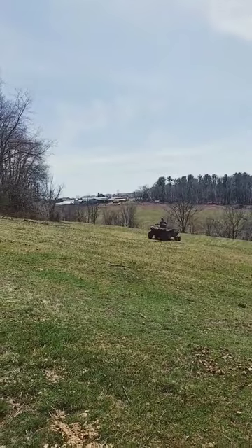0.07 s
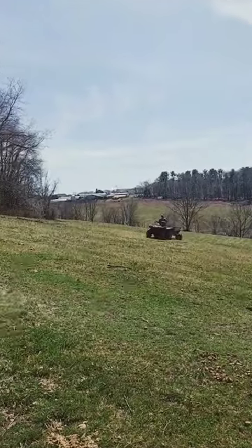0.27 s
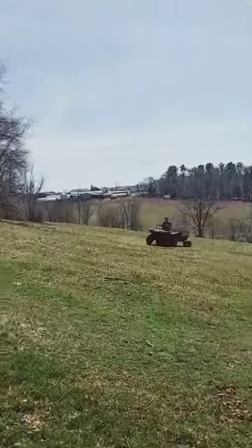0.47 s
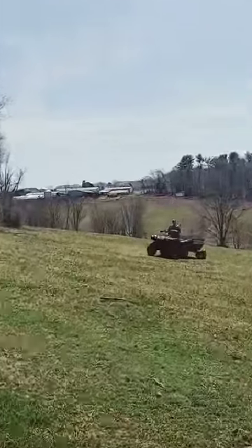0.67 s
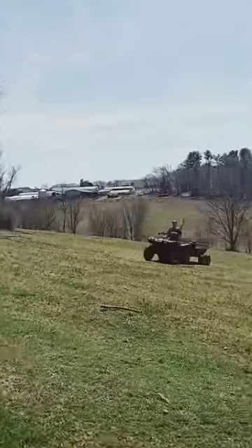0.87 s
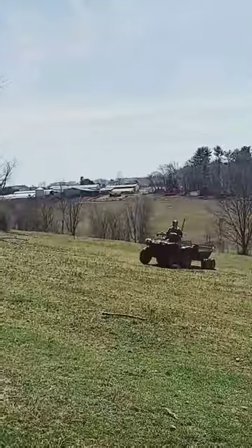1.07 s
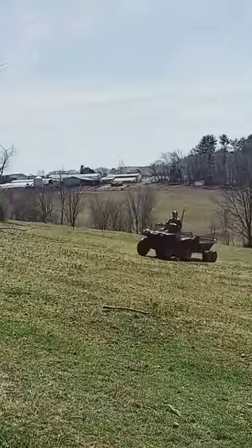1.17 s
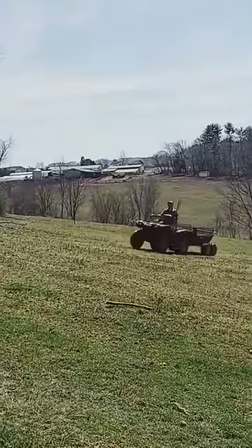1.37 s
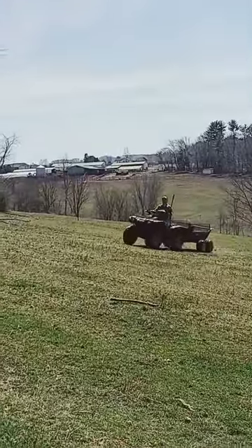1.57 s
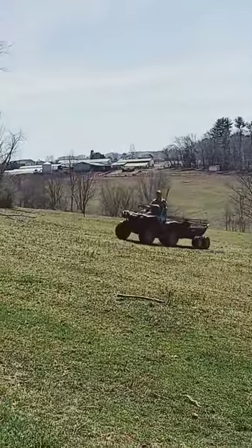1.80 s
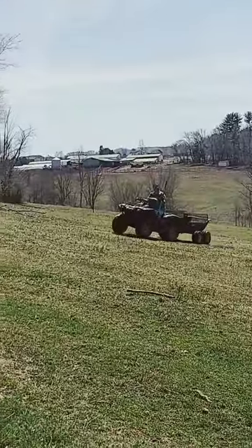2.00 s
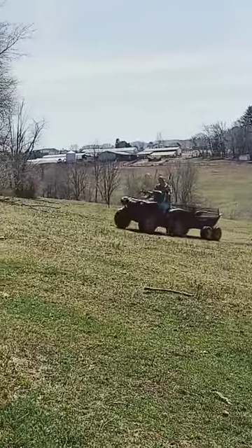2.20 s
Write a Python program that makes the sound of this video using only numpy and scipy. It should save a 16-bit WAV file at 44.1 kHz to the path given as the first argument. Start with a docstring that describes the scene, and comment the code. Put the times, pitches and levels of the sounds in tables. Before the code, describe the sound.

Steady low chug of a small single-cylinder off-road vehicle in an open field, with valve rattle and faint gear whine; soft wind buffets lean left, then a few hollow thumps, grass ticks and a twig snap.

```python
"""All-terrain vehicle over a pasture

A single-cylinder all-terrain vehicle crawls closer, towing a wagon; its layers follow one engine speed.
Each firing is a thump of tones locked to the firing rate, with a rough puff of coloured noise and clicks.
Valves clatter (impacts ringing a casing), gears whine (wavering tones), dry grass hisses and crackles.
A few dull thumps and a snapping twig ring resonances; wind rumbles (noise) mostly on the left port."""
import sys
import numpy as np
from scipy import signal
from scipy.fft import rfft, irfft
from scipy.io import wavfile

SR = 44100
rng = np.random.default_rng(int(sys.argv[2]) if len(sys.argv) > 2 else 0)


def dump_mix(stems):
    """Bounce the given channels to the path in sys.argv[1] as a 16-bit WAV at rate SR."""
    frames = np.atleast_2d(stems).T  # one column per channel
    limited = np.clip(frames, -1, 1)  # hard clip at full scale
    pcm = np.round(limited * 32767).astype(np.int16)
    wavfile.write(sys.argv[1], SR, pcm)


N = 98916
T = np.arange(N) / SR


def from_db(db):
    """Decibels to gain."""
    return 10 ** (np.asarray(db) / 20)


def rms_one(x):
    """Scale to rms 1."""
    return x / np.sqrt(np.mean(x ** 2) + 1e-20)


def in_time(rows):
    """Columns of a curve, interpolated at every sample."""
    s, *columns = np.transpose(rows)
    return [np.interp(T, s, c) for c in columns]


def swells(rows):
    """Sum of Gaussian rises and falls of gain; half is the time from the peak to 1/e."""
    return sum(from_db(db) * np.exp(-((T - s) / half) ** 2) for s, half, db in rows)


def pan(db):
    """Left and right gains for a level difference, left over right."""
    return from_db(np.array([[db], [-db]]) / 2)


def colour(x, spectrum):
    """Shape a signal by a gain curve over log frequency, falling off outside it; rms 1."""
    hz, db = np.transpose(spectrum)
    f = np.maximum(np.arange(N // 2 + 1) * SR / N, 1)
    gain = from_db(np.interp(np.log(f), np.log(hz), db))
    outside = np.minimum(f / hz[0], 1) * np.minimum(hz[-1] / f, 1)
    return rms_one(irfft(rfft(x) * gain * outside ** 2, N))


def drift(rate_hz):
    """Slow random motion, rms 1: low-passed noise drawn at every 32nd sample."""
    f = np.arange(2049) * SR / 32 / 4096
    slow = irfft(rfft(rng.standard_normal(4096)) / (1 + (f / rate_hz) ** 2))
    return rms_one(np.interp(np.arange(N) / 32, np.arange(len(slow)), slow))


def stereo(mid, side, alike):
    """Two unrelated signals mixed to a left and right of given correlation; rms 1."""
    alike = np.clip(alike, 0, .99)
    return rms_one(np.sqrt(1 + alike) * mid + np.sqrt(1 - alike) * side * np.array([[1], [-1]]))


def noise(alike):
    """White stereo noise."""
    return stereo(*rng.standard_normal((2, N)), alike)


def clicks(per_s, spread_db):
    """Random clicks of uneven size and sign; rms 1."""
    sizes = from_db(spread_db * np.minimum(rng.exponential(1, N), 3))
    return rms_one((rng.random(N) < per_s / SR) * sizes * rng.choice([-1, 1], N))


def resonate(x, modes):
    """Parallel two-pole resonances, each with its gain at the peak."""
    out = 0
    for hz, width_hz, db in modes:
        r = np.exp(-np.pi * width_hz / SR)
        poles = [1, -2 * r * np.cos(2 * np.pi * hz / SR), r * r]
        ringing = signal.lfilter([1, 0, -1], poles, x + 1e-18)
        out = out + from_db(db) * (1 - r * r) / 2 * ringing
    return out


def cut(x, hz, kind, order=2):
    """Butterworth filter."""
    return signal.sosfilt(signal.butter(order, hz, kind, fs=SR, output="sos"), x)


def at_ports(x, right_bass_cut_hz=406):
    """Left and right of a low sound: the right port loses the bass, with no delay."""
    once = cut(x, right_bass_cut_hz, "high")
    return np.array([x, cut(once[::-1], right_bass_cut_hz, "high")[::-1]])


def wind(wind_db=9, right_wind_db=-28, buffet_pan_db=9):
    """Wind noise: gusting rumble mostly on the left port, and short buffets on both."""
    # Each row: time in seconds, level in dB before wind_db.
    gusts = [(0.11, -44.5), (0.26, -44), (0.29, -40), (0.38, -42), (0.63, -46), (0.67, -40), (0.87, -39),
             (0.9, -52), (1.52, -39), (1.54, -43), (1.6, -30.5), (1.65, -43), (1.78, -39), (2.01, -39.5),
             (2.04, -46.5), (2.24, -35.5)]
    # Rumble spectrum. Each row: frequency in Hz, relative density in dB per Hz.
    wind_spectrum = [(24, -29), (32, -5.5), (42, -3), (68, -2), (100, -3.5), (160, -13), (250, -24.5),
                     (500, -33.5), (1000, -43)]
    # Each row: centre in seconds, half length in seconds, level in dB before panning.
    buffets = [(0.196, 0.072, -33.5), (.765, 0.013, -35), (1.46, 0.027, -39), (1.51, 0.0089, -31),
               (1.59, .024, -28.5)]
    # Buffet spectrum. Each row: frequency in Hz, relative density in dB per Hz.
    buffet_spectrum = [(30, -51), (70, 18), (130, -10), (220, 4.5), (370, -24.5), (520, -46), (900, -49)]
    gust_db, = in_time(gusts)
    rumble = colour(noise(alike=0.017), wind_spectrum) * from_db(gust_db + wind_db)
    rumble = rumble * from_db([[0], [right_wind_db]])
    left, right = swells(buffets) * colour(noise(alike=0.071), buffet_spectrum) * pan(buffet_pan_db)
    return rumble + np.array([left, cut(right, 61, "high")])


def grass(crackles_per_s=330, rustle_clicks_per_s=1100):
    """Dry grass brushed by tyres: noise and clicks hiss and rustle, stalks tick, one twig rings."""
    # Tyre hiss. Each row: time in seconds, level in dB before hiss_db.
    hiss_level = [(.1, -72), (.4, -52.5), (1.2, -49.5), (1.75, -47), (2.2, -53)]
    # Hiss spectrum. Each row: frequency in Hz, relative density in dB per Hz.
    hiss_spectrum = [(4000, 12.5), (7000, 4), (9000, 0.5), (12000, 4), (15500, 2)]
    # Each row: centre in seconds, half length in seconds, level in dB.
    rustle_times = [(.17, 0.019, -46), (1.075, 0.025, -45.5), (1.75, 0.012, -61), (1.875, 0.0082, -56),
                    (2.003, 0.0064, -43.5)]
    # Rustle spectrum. Each row: frequency in Hz, relative density in dB per Hz.
    rustle_spectrum = [(2500, -12), (3800, 3), (4700, 8), (5800, 5), (6700, 2), (7600, -13), (15000, -36)]
    # Ticking stalks. Each row: centre in seconds, level in dB before the high-pass.
    tick_times = [(0.642, -46), (0.954, -61), (1.129, -48), (1.642, -47), (1.743, -38), (1.755, -58),
                  (1.83, -48), (1.878, -43), (1.967, -47), (1.998, -43)]
    # Twig resonances. Each row: frequency in Hz, width in Hz, gain in dB.
    twig_modes = [(2850, 320, 0), (3490, 270, -6), (4300, 510, 0), (5990, 310, -14), (6840, 400, -11)]
    hiss_db, tick_half_s = -3.5, 0.002
    twig_s, twig_half_s, twig_peak_db, splinters = 1.8924, .0017, -20, .3

    crackle = stereo(clicks(crackles_per_s, 3.5), clicks(crackles_per_s, 8), alike=0.39)
    level_db, = in_time(hiss_level)
    hiss = colour(noise(alike=0.072) + crackle, hiss_spectrum) * from_db(level_db + hiss_db)

    rustling = noise(alike=.99) + clicks(rustle_clicks_per_s, spread_db=7)
    rustles = swells(rustle_times) * colour(rustling, rustle_spectrum)

    tick_swells = swells([(s, tick_half_s, db) for s, db in tick_times])
    ticks = cut(noise(alike=0.12) * tick_swells, 1500, "high")

    splintering = splinters * noise(alike=0.28) * swells([(twig_s, twig_half_s, 0)])
    snap = signal.unit_impulse(N, int(twig_s * SR)) + splintering
    twig = cut(resonate(snap, twig_modes), [2500, 6800], "band", order=3)
    twig = from_db(twig_peak_db) * twig / np.abs(twig).max()
    return (hiss + rustles + ticks + twig) * pan(-1)


def thumps(contact_half_s=0.00088):
    """Soft blows on a hollow, well damped body, perhaps the wagon jolting."""
    # Each row: time in seconds, blow level in dB.
    blow_times = [(1.455, -23), (1.507, -19), (1.566, -21), (1.587, -12.5), (1.751, -21)]
    # Body resonances. Each row: frequency in Hz, width in Hz, gain in dB.
    body_modes = [(83, 29, 5), (143, 42, -2), (203, 28, -18), (353, 59, -4.5)]
    blows = swells([(s, contact_half_s, db) for s, db in blow_times])
    body = resonate(blows, body_modes)
    return at_ports(body * blows.max() / np.abs(body).max())


def gears(cycles, wander_rad=0.35, flutter_db=2.5):
    """Wavering tones locked to the engine speed swell and fade."""
    # Each row: multiple of the firing rate, centre in seconds, half length in seconds, peak level in dB.
    whine = [(60, .2, .14, -48), (70, .22, .13, -52.5), (59, .66, .33, -51), (80, .8, .27, -54),
             (39, 1.35, .15, -58), (70, 1.47, .12, -57), (60, 1.82, .15, -49), (75, 1.97, .11, -48.5),
             (56, 2.03, .07, -51), (59, 2.22, .12, -47), (120, 2.08, .1, -56)]
    out = 0
    for k, s, half, db in whine:
        level = swells([(s, half, db)]) * from_db(flutter_db * drift(25))
        out = out + level * np.sin(2 * np.pi * k * cycles + wander_rad * drift(19))
    return out


def clatter(cycles, level_db, impacts_per_s=1100, impact_share=0.2):
    """Valves, chain and belt: impacts and rubbing swell twice per firing cycle and ring the casing."""
    # Direct spectrum. Each row: frequency in Hz, relative density in dB per Hz.
    clatter_spectrum = [(500, 6.5), (800, -0.5), (1200, -1), (1700, 3), (2400, 2.5), (2800, -0.5),
                        (3250, -3.5), (4200, -4), (6200, -1.5), (7200, -13.5), (9000, -20.5),
                        (15000, -12.5)]
    # Engine casing resonances. Each row: frequency in Hz, width in Hz, gain in dB.
    casing_modes = [(1320, 70, 0), (1697, 60, -2), (1930, 110, 2), (2610, 90, 3.5), (4100, 70, -4),
                    (4600, 80, -4), (5550, 120, -5)]
    direct_db, casing_db, swing_db, flutter_db = 1, -10, 0.6, 1.05
    impacts = stereo(clicks(impacts_per_s, 2.5), clicks(impacts_per_s, 9), alike=0.72)
    drive = np.sqrt(impact_share) * impacts + np.sqrt(1 - impact_share) * noise(alike=0.51)
    swell_db = swing_db * np.cos(2 * np.pi * 2 * cycles)  # once per crank turn
    drive = drive * from_db(swell_db + flutter_db * drift(60))
    direct = from_db(direct_db) * colour(drive, clatter_spectrum)
    casing = from_db(casing_db) * rms_one(resonate(drive, casing_modes))
    return from_db(level_db) * (direct + casing)


def puffs(cycles, level_db, eddies_per_s=220, eddy_share=0.63):
    """Turbulent gas (noise) and its eddies (clicks) swell after each firing, never twice alike."""
    # Each row: frequency in Hz, relative density in dB per Hz.
    puff_spectrum = [(120, -33), (220, -12.5), (290, -5), (370, -1), (470, -7), (620, -18), (900, -21.5),
                     (1500, -26.5)]
    puff_db, peak_phase_cycles, swing_db, pan_db = -2, 0.081, 1, -6
    eddies = stereo(clicks(eddies_per_s, 1.5), clicks(eddies_per_s, 0), alike=0.56)
    gas = np.sqrt(eddy_share) * eddies + np.sqrt(1 - eddy_share) * noise(alike=0.43)  # power share
    swell_db = swing_db * np.cos(2 * np.pi * (cycles - peak_phase_cycles))
    return colour(gas * from_db(swell_db), puff_spectrum) * from_db(level_db + puff_db) * pan(pan_db)


def exhaust(cycles, level_db, flutter_db=1.64, wander_rad=0.064, jitter_cycles=0.0067):
    """Pipe tones line up once per firing into a thump that sweeps upward; the timing is a little uneven."""
    # Levels in dB of the multiples 2, 3, 4 .. of the firing rate, before the common swing.
    tone_levels_db = [-50.5, -37, -39.5, -52.5, -51, -54, -44.5, -51, -48, -50.5, -50, -58, -57, -66, -57]
    firing_phase_cycles, pipe_spread_s_per_hz = 0.0669, .000012  # higher tones leave the pipe later
    follow_share, scatter_db = 0.26, 1.6  # share of the puffs' level swing; random level scatter
    rate_hz = cycles[-1] / T[-1]
    uneven = cycles - firing_phase_cycles + jitter_cycles * drift(6.8)
    thump = 0
    for k, db in enumerate(tone_levels_db, 2):
        late_cycles = pipe_spread_s_per_hz * (k * rate_hz) ** 2 / 2
        phase = 2 * np.pi * (k * uneven - late_cycles) + wander_rad * k * drift(1.5)
        thump = thump + from_db(db + flutter_db * drift(7)) * np.cos(phase)
    swing_db = follow_share * (level_db - level_db.mean()) + scatter_db * drift(39)
    return at_ports(np.sqrt(2) * thump * from_db(swing_db))


def scene():
    """Engine layers share one speed and, with the thumps, reach the right port a sample later."""
    # Each row: time in seconds, firing rate in Hz.
    speed = [(0.1, 32.06), (0.35, 32.23), (0.6, 32.81), (0.85, 33.1), (1.1, 33.33), (1.4, 33.92),
             (1.7, 34.14), (2.0, 34.53), (2.24, 34.38)]
    # Each row: time in seconds, base level of the puffs in dB, base level of the clatter in dB.
    engine_levels = [(0.1, -48.5, -45), (0.18, -36, -43), (0.25, -40, -46), (0.55, -40, -46.5),
                     (0.8, -41, -47), (0.97, -45, -47.5), (1.06, -43, -46.5), (1.2, -48.5, -47.5),
                     (1.3, -38.5, -45.5), (1.52, -41, -46.5), (1.61, -37.5, -45.5), (1.65, -40.5, -49.5),
                     (1.73, -37.5, -44.5), (1.86, -39.5, -45), (1.97, -40, -48), (1.99, -34.5, -45),
                     (2.22, -42, -45.5)]
    firing_hz, = in_time(speed)
    cycles = np.cumsum(firing_hz) / SR
    puff_db, clatter_db = in_time(engine_levels)
    around = wind() + grass()
    engine = gears(cycles) + clatter(cycles, clatter_db) + puffs(cycles, puff_db) + exhaust(cycles, puff_db)
    left, right = engine + thumps()
    return around + np.array([left, np.roll(right, 1)])


def record(dry, start_s=.086, fade_s=.014, cutoff_hz=15650):
    """The microphone opens after a moment with a short fade; a steep low-pass cuts the top."""
    opened = dry * np.clip((T - start_s) / fade_s, 0, 1)
    return signal.sosfilt(signal.ellip(12, .2, 80, cutoff_hz, fs=SR, output="sos"), opened)


dry = scene()
out = record(dry)
dump_mix(out)
```